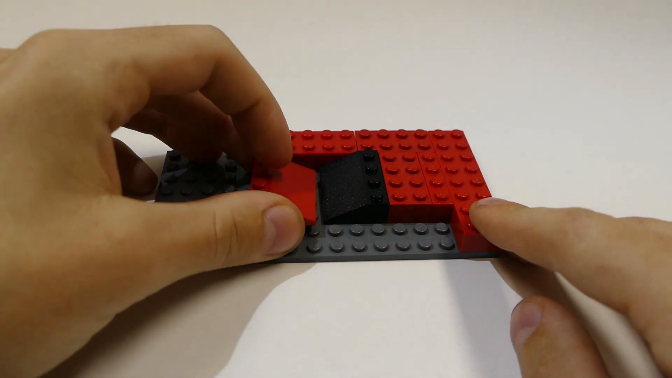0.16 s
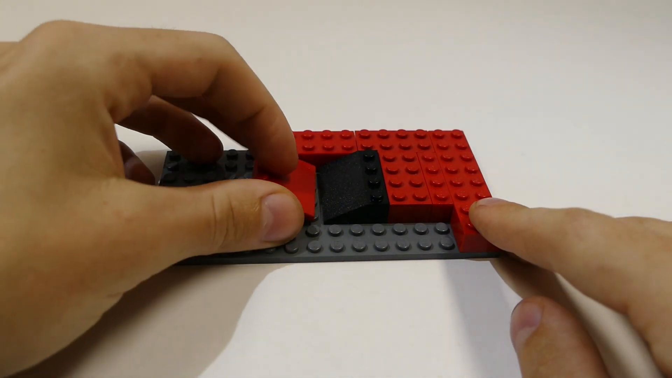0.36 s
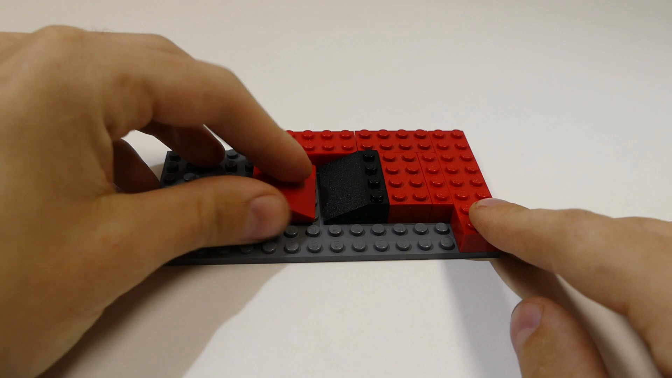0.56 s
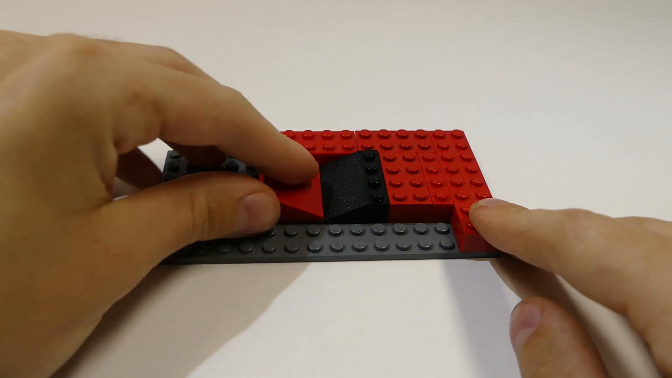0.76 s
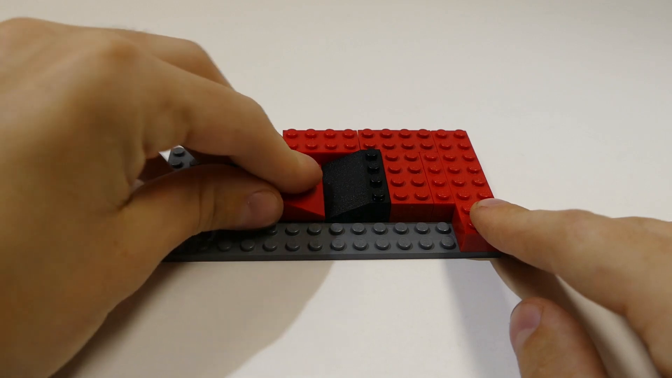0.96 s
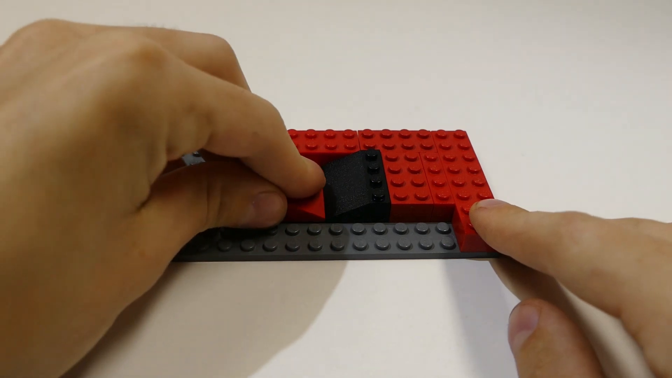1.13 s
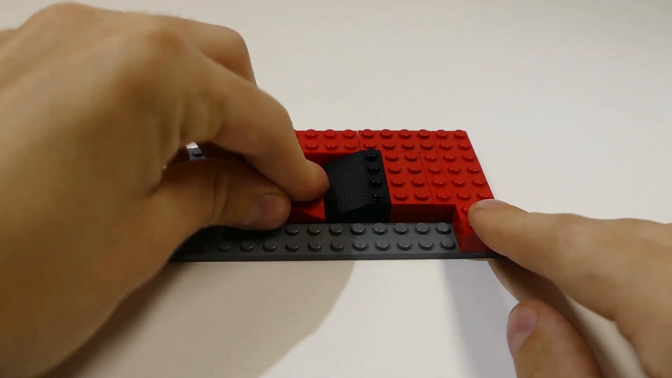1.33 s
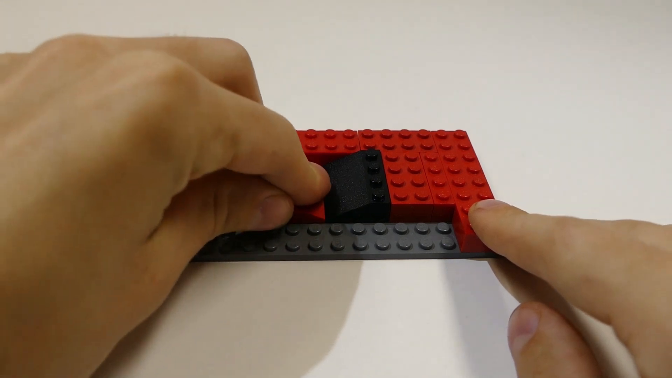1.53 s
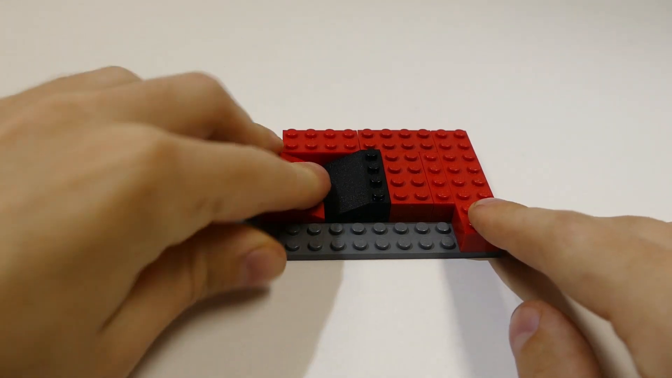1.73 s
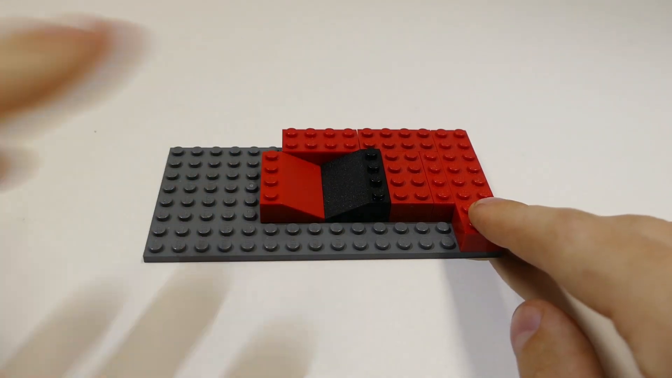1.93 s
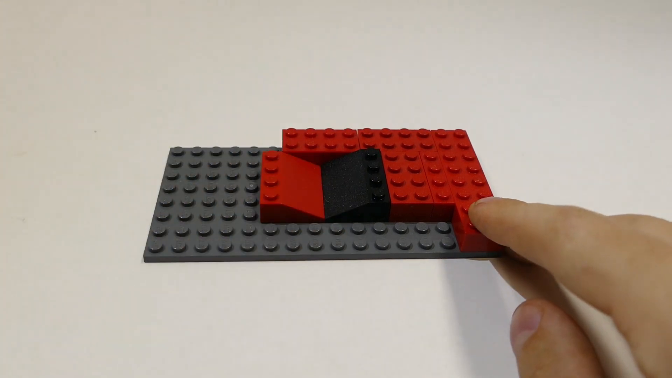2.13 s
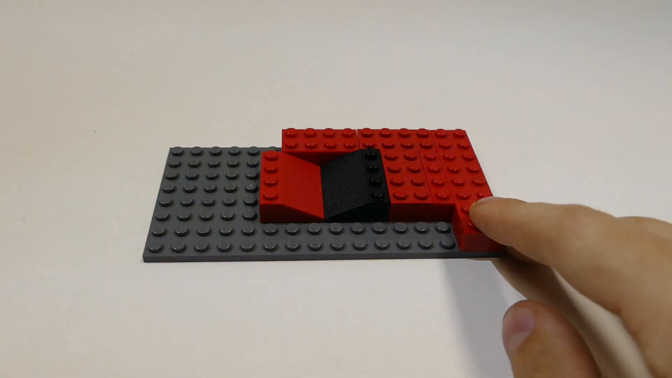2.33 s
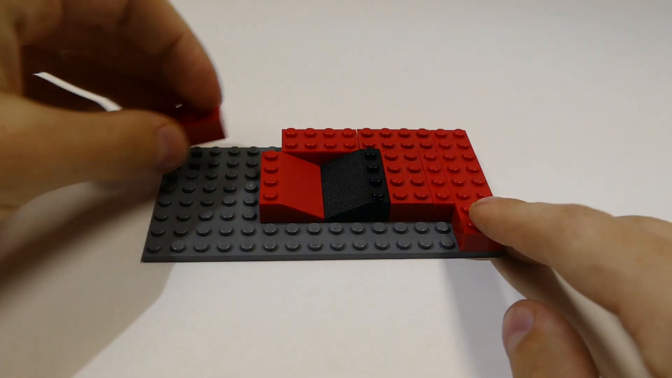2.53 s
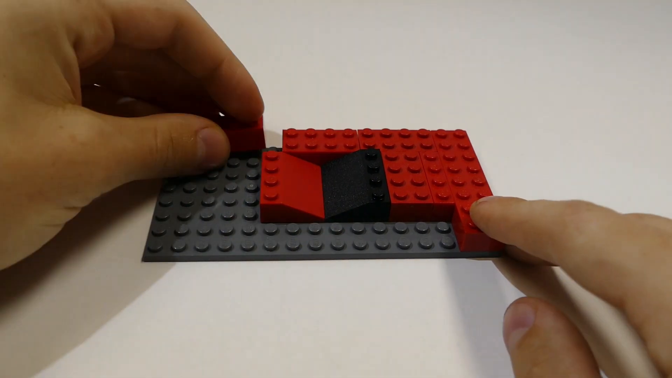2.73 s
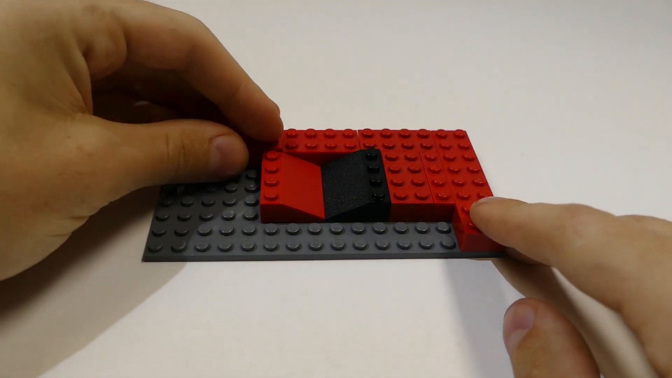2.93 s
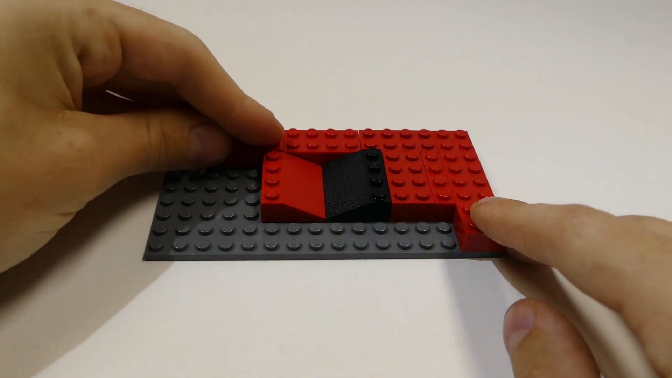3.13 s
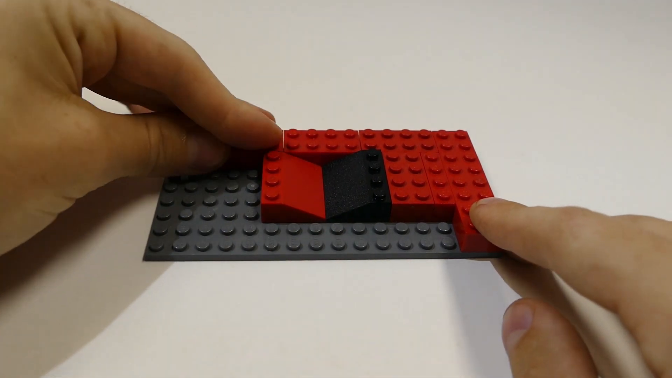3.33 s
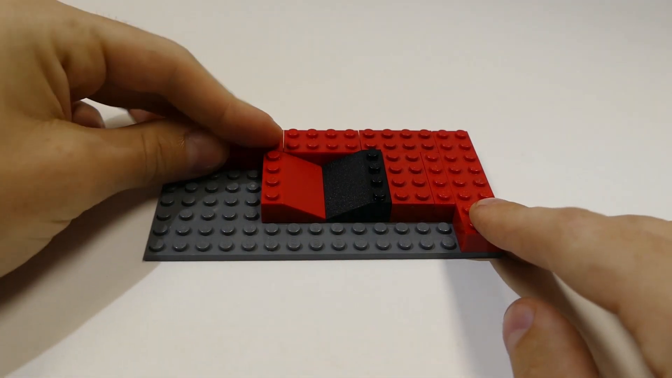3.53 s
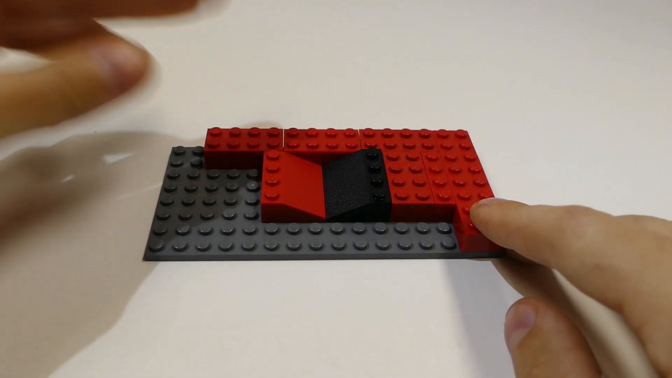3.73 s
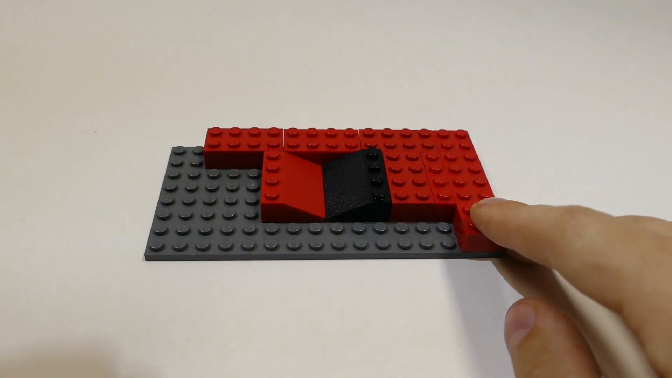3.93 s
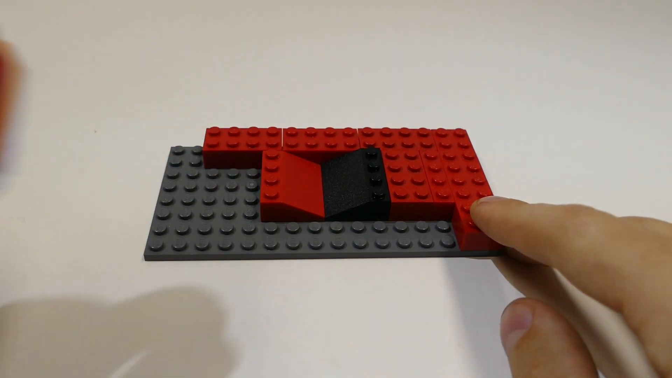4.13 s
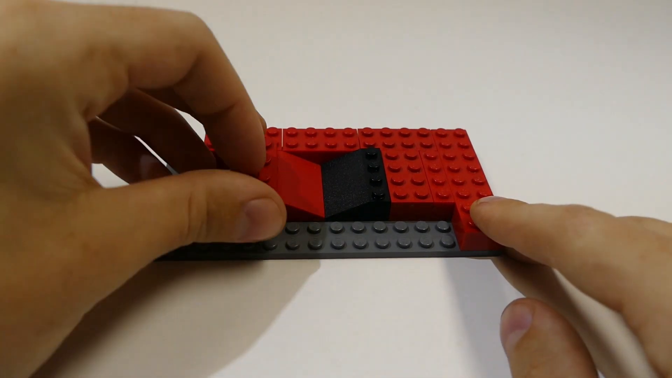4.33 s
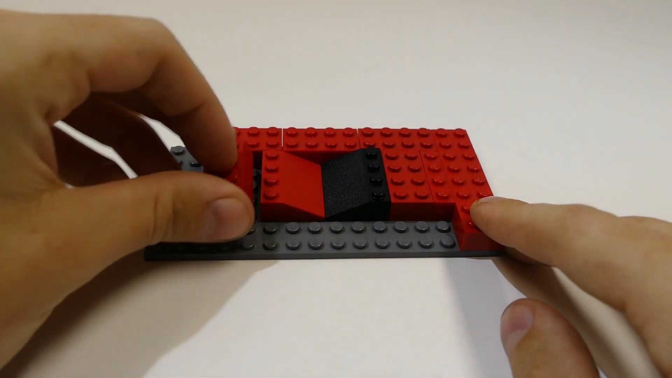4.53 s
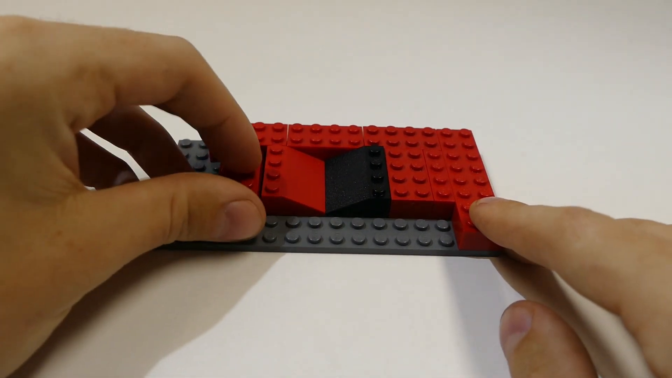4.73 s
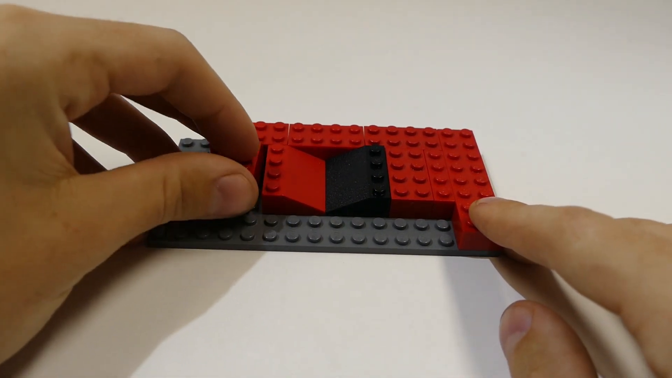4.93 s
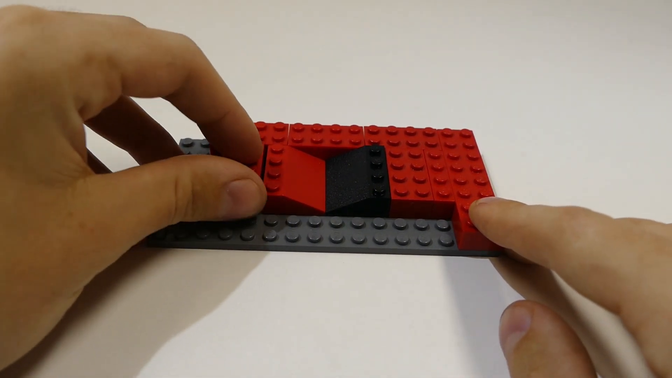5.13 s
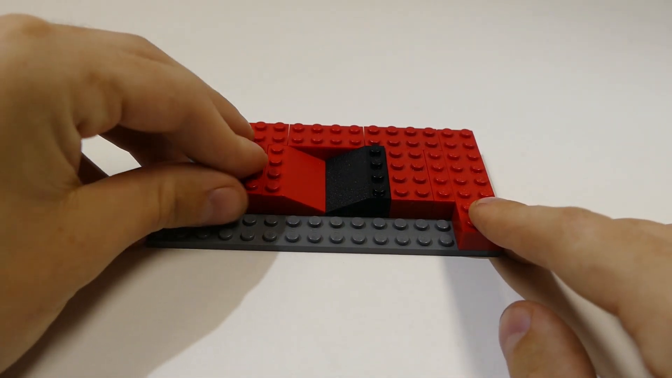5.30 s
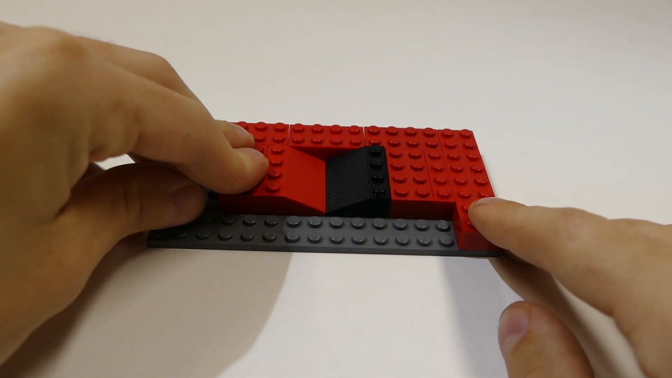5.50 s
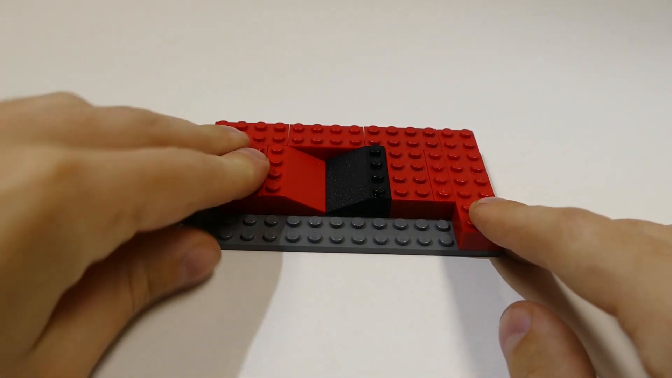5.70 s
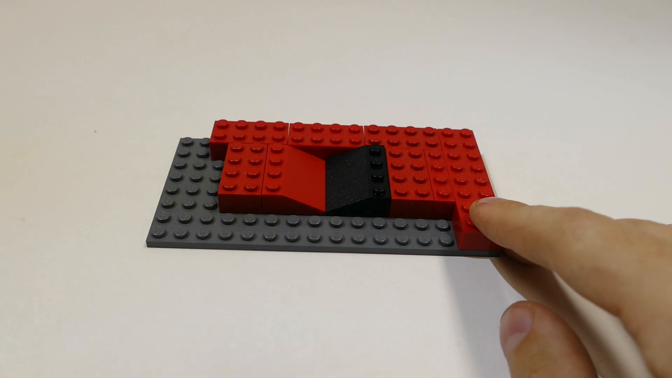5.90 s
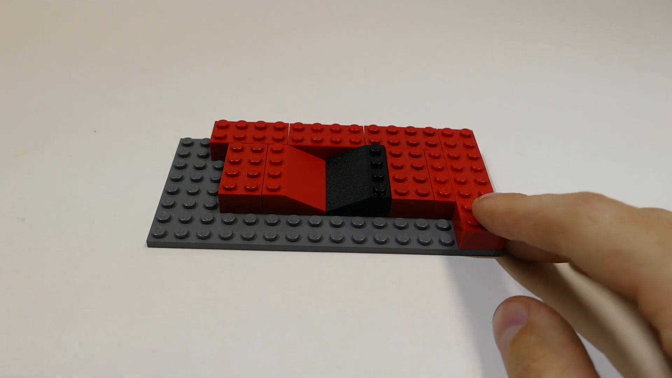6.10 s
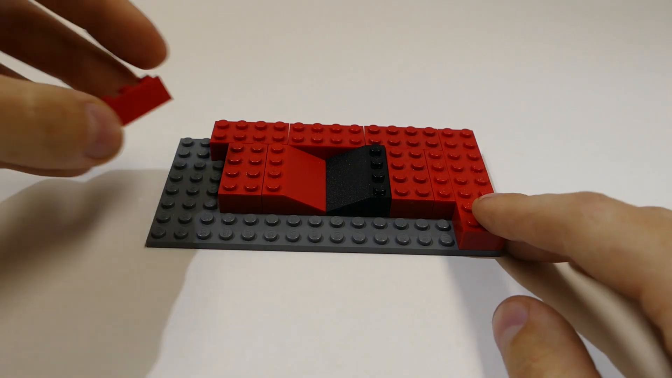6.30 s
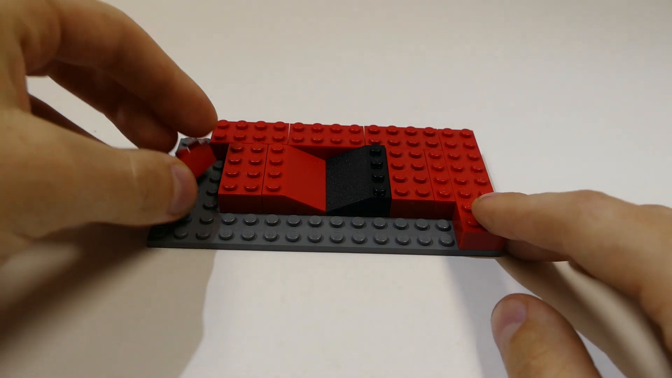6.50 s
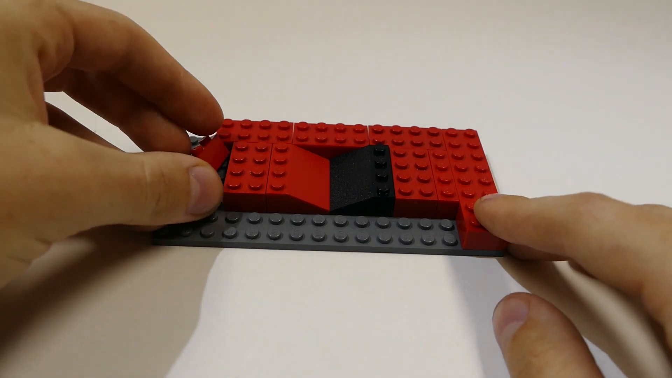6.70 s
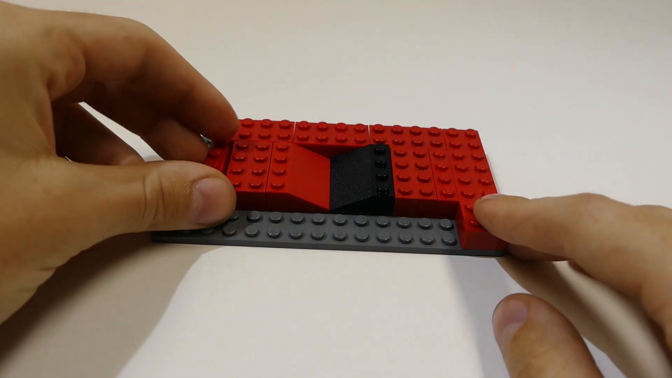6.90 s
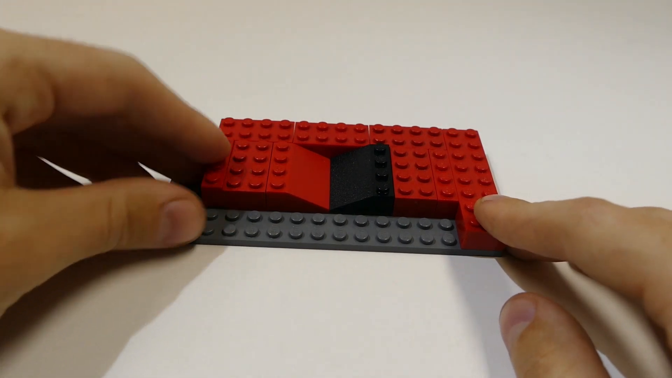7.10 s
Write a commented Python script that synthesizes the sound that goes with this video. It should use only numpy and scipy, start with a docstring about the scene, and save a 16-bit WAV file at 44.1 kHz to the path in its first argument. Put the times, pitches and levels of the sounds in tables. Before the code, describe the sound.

Small hollow plastic bricks click and snap onto a studded base plate in uneven bursts, with soft hand rubbing over quiet room tone.

```python
"""On a table in a quiet room, plastic bricks are set down, nudged and pressed onto a studded base plate.
Each contact excites modes of plate, table and hollow bricks plus a noise snap; the ceiling returns it.
Hands and sleeves rub softly as shaped noise over a faint steady rustle, thumps and squeaks are sines with
noise or waver, and filtered noise gives a room tone with a low hum and a thin wavering whine, in stereo."""
import sys
import numpy as np
from scipy import signal
from scipy.fft import rfft, irfft
from scipy.io import wavfile
from scipy.ndimage import uniform_filter1d

SR = 44100
rng = np.random.default_rng(int(sys.argv[2]) if len(sys.argv) > 2 else 0)


def unload_audio(sound):
    """Save the sound as a 16-bit wav file, at the path given as the first command line argument."""
    columns = np.transpose(np.atleast_2d(sound))
    # keep every value between -1 and 1, then stretch to whole-number steps
    steps = np.round(np.clip(columns, -1, 1) * 32767)
    wavfile.write(sys.argv[1], SR, steps.astype(np.int16))


N = 315305

# Contacts of brick, plate and table. Each row: start in seconds, plate peak in dB, pitch of the struck
# spot on the base in Hz, on the brick in Hz, then in dB relative to the plate: table knock, brick ring,
# edge tick.
CONTACTS = [(0.3883, -25.5, 1300, 3050, -6.5, 5.5, -9), (0.4066, -24.5, 747, 2960, -6, -10, -23),
            (0.416, -31, 850, 3170, -7, -7, -25), (0.4971, -17, 1342, 4053, -15, 1, -14),
            (0.754, -30.5, 1400, 3480, -19, 0, -23), (0.7685, -26.5, 1960, 3266, -6, 8, -2),
            (0.779, -21.5, 1988, 3405, -5, 3, -13), (1.8663, -42.5, 1040, 2780, -4, -6, -10.5),
            (2.7033, -34.5, 1414, 3150, -8.5, -8.5, -16.5), (2.7176, -37.5, 1390, 3730, -8, -4.5, -22),
            (2.9507, -28, 1375, 2970, -14, -4.5, -18), (2.9717, -27.5, 2000, 2400, -3.5, -7, -22.5),
            (2.9777, -22, 1370, 2200, -10.5, 3, -10.5), (3.2135, -47.5, 1270, 3680, -4, -0.5, 3),
            (3.309, -42.5, 1030, 2800, -11, -8, -12.5), (4.3913, -14.5, 1224, 2830, -12.5, -11.5, -23),
            (4.4291, -29.5, 870, 2350, -1.5, -17, -33), (4.4503, -30, 1180, 2590, -3, -19, -34),
            (4.523, -35.5, 868, 2830, -8.5, -23, -26), (4.6361, -31.5, 1290, 2800, -6, -7, -26),
            (4.6416, -25.5, 1404, 3350, -6, -5.5, -19.5), (4.6914, -37.5, 1210, 4460, -7, 5.5, -7),
            (4.7637, -33.5, 465, 3300, 1.5, -1.5, -11), (4.9248, -19, 1500, 3360, -8.5, -7, -15),
            (4.931, -15, 1430, 4530, -6, -8.5, -8), (4.9473, -22.5, 1190, 3170, -1.5, -1, -15),
            (5.048, -33.5, 1470, 3280, -4, 2, -26), (5.1003, -34, 696, 3240, -5, -4, -26),
            (5.1313, -40, 723, 3120, -2, -5, -25), (5.1531, -24, 788, 3140, -3, 0.5, -21.5),
            (5.2555, -42, 1970, 2980, 2, 0, -9), (5.2579, -16, 726, 2830, 0, 0, -3.5),
            (5.466, -46, 1880, 2370, -20, 0, -2.5), (5.805, -48, 1350, 3790, -4, -6, -11),
            (6.5886, -20, 1613, 3060, -12, -3.5, -16.5), (6.6649, -38.5, 1390, 3470, -8.5, -23, -9.5),
            (6.715, -37.5, 1930, 3700, -13, -14, -18), (6.7417, -40.5, 1330, 3440, -2, -12, -11),
            (6.7694, -28, 1300, 3030, -9.5, -16, -22), (6.776, -30, 1300, 3500, -9.5, -7.5, -23),
            (6.7953, -33, 1380, 5000, -9, 1.5, -2.5), (6.9056, -18.5, 1645, 3400, -10.5, -2, -14),
            (6.9226, -17, 1260, 3220, -7, 6, -4.5), (7.0516, -22.5, 1420, 3820, -27, 1.5, -12.5)]
# Modes of plate, table, brick cavity, brick walls and edge, in that order. Each row of a part: frequency
# in Hz, relative level in dB.
PART_MODES = [
    [(950, -2), (1100, -3), (1230, 0), (1365, 0), (1610, -1), (1930, -6)],
    [(460, -5), (695, 0), (815, -1)],
    [(2470, -7), (3100, -2), (3310, 0), (3550, -3)],
    [(4120, -2), (4540, -5), (5180, -5), (5910, -3), (6400, -7)],
    [(9500, -3), (10200, 0), (11300, -6)],
]
# The same five parts: decay time to -60 dB in seconds, before the struck spot prolongs it.
PART_T60 = [0.018, 0.025, 0.013, 0.013, 0.011]
# The same five parts: left minus right level in dB.
PART_PAN_DB = [-1, -3.9, 2, 0.8, -0.3]
# Low modes of the rubbed table. Each row: frequency in Hz, width in Hz, relative level in dB.
TABLE_MODES = [(406, 21, 0.5), (669, 8.6, 7), (805, 11.5, 4), (919.5, 7.4, 1.5), (1425, 110, -10.5),
               (2007, 37, -7.5)]
# Spectrum of the soft broadband swish. Each row: frequency in Hz, relative density in dB.
SWISH_SPECTRUM = [(80, -26), (250, -5.5), (450, 1.5), (1000, -5), (1600, -2.5), (4000, -17), (9000, -34),
                  (16000, -59.5)]
# Spectrum of fingertips on plastic. Each row: frequency in Hz, relative density in dB.
HISS_SPECTRUM = [(3000, -38), (5800, -9), (8000, -13.5), (9800, -8), (12000, -15.5), (15500, -23)]
# Spectrum of the room's air noise. Each row: frequency in Hz, relative density in dB.
AIR_SPECTRUM = [(20, -52), (85, -66), (130, -4), (300, -4.5), (600, -6), (1000, -14.5), (1460, -9.5),
                (2600, -20.5), (3500, -24.5), (8000, -27.5), (10000, -25.5), (15000, -30.5)]
# Likeness of the air noise at left and right. Each row: frequency in Hz, correlation (0 to 1).
AIR_LIKENESS = [(130, 1), (300, 0.88), (700, 0.015), (3000, 0.046), (15000, 0.13)]
# Narrow tones in the room. Each row: frequency in Hz, width in Hz, mean level in dB.
ROOM_TONES = [(119.9, 9.4, -75.5), (142.6, 9.9, -76), (2809, 35, -72)]
# Narrow dips in the overall spectrum. Each row: frequency in Hz, width in Hz.
SPECTRUM_DIPS = [(575, 44), (2680, 35)]
# Rubbing that hums in the table. Each row: start in seconds, length in seconds, level in dB.
HUM_STROKES = [(1.42, 0.17, -56), (1.6, .12, -55), (1.75, 0.15, -59), (1.88, 0.072, -55), (2.0, 0.078, -57),
               (2.11, 0.18, -60.5), (3.37, 0.18, -59), (3.66, 0.058, -51.5), (3.78, 0.18, -58.5),
               (5.51, 0.097, -59), (5.68, 0.1, -59), (5.96, 0.074, -59.5)]
# Soft broadband noise, in short swishes and in long, faint, steady stretches. Each row: start in seconds,
# length in seconds, level in dB.
SWISH_STROKES = [(0, 1.43, -66.5), (1.38, 0.94, -68.5), (2.45, 0.32, -61.5), (2.75, 0.94, -66),
                 (3.66, 0.13, -58.5), (3.76, .33, -55.5), (4.19, 1.82, -64), (5.76, .17, -59)]
# Fingertips turning a brick. Each row: start in seconds, length in seconds, level in dB.
HISS_STROKES = [(3.18, 0.055, -59.5), (6.195, 0.065, -60.5), (6.265, 0.064, -61)]
# Soft bumps of a hand on the table. Each row: start in seconds, level in dB, pitch in Hz.
HAND_THUMPS = [(1.395, -42, 176), (2.975, -37, 279), (3.307, -48.5, 199), (3.572, -50, 235),
               (5.251, -41, 168), (6.141, -55.5, 151), (6.588, -41.5, 266)]
# Faint rising squeaks. Each row: start in seconds, length in seconds, start pitch in Hz, end pitch in Hz,
# level of the fundamental in dB.
SQUEAK_GLIDES = [(2.233, 0.072, 4690, 5000, -82), (5.987, 0.098, 4780, 5360, -76.5)]

SNAP_DB, SNAP_T60 = -3, 0.019  # snap relative to the summed modes, decay in seconds
APART = 0.11  # left-right difference in radiation, as a fraction
FAVOUR_DB, FAVOUR_OCTAVES = 9.5, 0.16  # boost of modes near the struck spot, and its reach
DETUNE = 0.026  # random spread of mode pitch, as a fraction
MODE_SPREAD_DB = 2  # random spread of mode level, in dB
LINGER_HZ = 3210  # a mode at a struck spot of this pitch rings twice as long, at lower spots less
WALLS_DB, WALLS_FROM_HZ = -5.5, 3950  # walls relative to cavity, unless the struck spot is this high
CEILING_S, CEILING_DB = .0132, -14  # delay and loss of each return
SWISH_HISS_DB = -10  # hiss that goes along with the swish
ROOM_DB = -61.5
TOP_HZ = 15700


def clicks(low_hz=280):
    """Superposition: each contact is the sum of the responses of all parts that it excites."""
    out = np.zeros((2, N + SR))
    t = np.arange(2048) / SR
    for s, plate_db, base_hz, brick_hz, table_db, brick_db, edge_db in CONTACTS:
        at = int(s * SR)
        walls_db = brick_db + WALLS_DB * (brick_hz < WALLS_FROM_HZ)
        levels = [0, table_db, brick_db, walls_db, edge_db]
        spots = [base_hz, base_hz, brick_hz, brick_hz, brick_hz]
        for part, db, spot_hz, part_t60, pan_db in zip(PART_MODES, levels, spots, PART_T60, PART_PAN_DB):
            hit = struck_part(part, spot_hz, part_t60, t)
            pan = undb([[pan_db / 2], [-pan_db / 2]])
            out[:, at:at + len(t)] += undb(plate_db + db) * pan * hit / np.abs(hit.mean(0)).max()
    # small light parts radiate no bass
    return signal.sosfilt(signal.butter(4, low_hz, "high", fs=SR, output="sos"), out[:, :N])


def struck_part(part, spot_hz, part_t60, t, rise_cycles=0.86):
    """Impact response: free modes and a snap, built up over about a cycle of the lowest mode."""
    hz, mode_db = np.transpose(part)[:, :, None]
    ring = ringing_modes(hz, mode_db, spot_hz, part_t60, t)
    snap = plastic_snap(hz, spot_hz, t)
    hit = ring + undb(SNAP_DB + mode_db).sum() * snap / np.abs(snap).max()
    return hit * np.sin(np.pi / 2 * np.minimum(t * hz.min() / rise_cycles, 1)) ** 2


def ringing_modes(hz, mode_db, spot_hz, part_t60, t):
    """Modal superposition: damped sines, of which the struck spot favours its neighbours."""
    spread, shift, side = rng.standard_normal((3, len(hz), 1))
    # modes near the pitch of the struck spot bend towards it and are boosted and prolonged
    near = np.exp(-(np.log2(hz / spot_hz) / FAVOUR_OCTAVES) ** 2)
    gain = undb(mode_db + MODE_SPREAD_DB * spread + FAVOUR_DB * near)
    t60 = part_t60 * (1 + near * spot_hz / LINGER_HZ)
    pitch = hz * (spot_hz / hz) ** near * (1 + DETUNE * shift * (1 - near / 2))
    modes = gain * np.sin(2 * np.pi * pitch * t) * 1000. ** (-t / t60)
    # each mode radiates a little differently to left and right
    return np.array([(modes * (1 + APART * side)).sum(0), (modes * (1 - APART * side)).sum(0)])


def plastic_snap(hz, spot_hz, t, spot_width=0.34, spot_db=5):
    """High modal density: countless small damped modes act as decaying noise, densest round the spot."""
    edges_hz = [hz.min() / 1.063, hz.max() * 1.073]
    band = signal.butter(3, edges_hz, "band", fs=SR, output="sos")
    mid, opposed = rng.standard_normal((2, len(t))) * 1000. ** (-t / SNAP_T60)
    snap = signal.sosfilt(band, [mid + 2 * APART * opposed, mid - 2 * APART * opposed])
    return snap + undb(spot_db) * resonate(snap, spot_hz, spot_width * spot_hz)


def room(x, early_db=-27, early_t60=0.1, late_db=-47, late_t60=0.38, shared=0.63, dull_hz=11000,
         smear_s=0.00014):
    """Reflection: flutter between table and ceiling, each return more smeared, over two decaying tails."""
    t = np.arange(SR // 2) / SR
    common, left, right = rng.standard_normal((3, len(t)))
    noise = shared * common + (1 - shared) * np.array([left, right])
    early = undb(early_db) * 1000. ** (-t / early_t60)
    late = undb(late_db) * 1000. ** (-t / late_t60)
    tail = noise * (early + late)
    tail[:, :int(.002 * SR)] = 0
    for k in range(1, 4):
        bounce = noise * np.exp(-((t - k * CEILING_S) / (smear_s * k)) ** 2)
        tail += undb(k * CEILING_DB) * bounce / np.sqrt(np.sum(bounce ** 2) / 2)
    tail = signal.lfilter(*signal.butter(1, dull_hz, fs=SR), tail)
    return x + signal.fftconvolve(x, tail, axes=1)[:, :N]


def hands():
    """Friction noise: rubbing hums in the table's low modes, a soft broadband swish, fingertip hiss."""
    hum = pair(table_rub, 0.88)
    swish = pair(lambda: coloured(SWISH_SPECTRUM), 0.63)
    hiss = pair(lambda: coloured(HISS_SPECTRUM), 0.72)
    # the level of each wanders by a few dB
    hum_swing, swish_swing, hiss_swing = undb([2.8 * walk(90), 1.8 * walk(45), 1.8 * walk(35)])
    swish_gain = strokes(SWISH_STROKES, .1)
    hiss_gain = strokes(HISS_STROKES, .035) + undb(SWISH_HISS_DB) * swish_gain
    rubbing = hum * strokes(HUM_STROKES) * hum_swing
    return rubbing + swish * swish_gain * swish_swing + hiss * hiss_gain * hiss_swing + thumps()


def table_rub():
    """Forced resonance: friction noise drives the table's low modes."""
    return unit(sum(undb(db) * resonate(rng.standard_normal(N), hz, width_hz)
                    for hz, width_hz, db in TABLE_MODES))


def thumps(rise_s=0.011, t60=0.15, scuff_db=1.0):
    """Soft impact: flesh pushes slowly, so it wakes the table's bass, and scuffs a little."""
    out = np.zeros(N + SR)
    t = np.arange(4096) / SR
    envelope = (1 - np.exp(-t / rise_s)) * 1000. ** (-t / t60)
    for s, db, hz in HAND_THUMPS:
        scuff = unit(resonate(rng.standard_normal(len(t)), 1.6 * hz, hz))
        body = np.sin(2 * np.pi * hz * t) + undb(scuff_db) * scuff
        out[int(s * SR):][:len(t)] += undb(db) * body * envelope
    return out[:N]


def squeaks(octave_db=8.0, waver=0.0096):
    """Frequency modulation: thin wavering tones with a stronger octave glide up and fade in and out."""
    out = np.zeros(N)
    for s, length, start_hz, end_hz, db in SQUEAK_GLIDES:
        at, n = int(s * SR), int(length * SR)
        pitch = np.linspace(start_hz, end_hz, n) * (1 + waver * walk(46)[:n])
        turns = np.cumsum(pitch) / SR
        tone = np.sin(2 * np.pi * turns) + undb(octave_db) * np.sin(4 * np.pi * turns)
        out[at:at + n] += undb(db) * np.hanning(n) * tone
    return out


def room_tone():
    """Broadband and narrowband noise: slightly breathing air, and wavering tones up to a thin whine."""
    air_gain = undb(ROOM_DB + .5 * walk(12.0))
    air = pair(lambda: coloured(AIR_SPECTRUM), on_log(AIR_LIKENESS)) * air_gain
    for hz, width_hz, db in ROOM_TONES:
        tone = pair(lambda: unit(resonate(rng.standard_normal(N), hz, width_hz)), 0.9)
        air += undb(db + 1.8 * walk(9)) * tone
    return air


def strokes(table, edge_s=0.041):
    """Amplitude envelope: gain of strokes that set in and let go softly."""
    t, gain = np.arange(N) / SR, 0
    for s, length, db in table:
        inside_s = np.minimum(t - s, s + length - t)
        gain = gain + undb(db) * np.clip(inside_s / edge_s + .5, 0, 1) ** 2
    return gain


def pair(make, likeness):
    """Interchannel correlation: left and right from a shared and an opposed noise."""
    c = np.clip(likeness, 0, 1)
    mid = rfft(make()) * np.sqrt((1 + c) / 2)
    side = rfft(make()) * np.sqrt((1 - c) / 2)
    return np.array([irfft(mid + side, N), irfft(mid - side, N)])


def coloured(points):
    """Spectral shaping: noise of rms 1 with the given (Hz, dB) spectrum."""
    return unit(irfft(rfft(rng.standard_normal(N)) * undb(on_log(points)), N))


def on_log(points):
    """Logarithmic frequency: (Hz, value) points interpolated on every bin of an N-point spectrum."""
    hz, value = np.transpose(points)
    return np.interp(np.log(np.fft.rfftfreq(N, 1 / SR) + 1), np.log(hz), value)


def resonate(x, hz, width_hz):
    """Resonance: a single mode with gain 1 at its centre."""
    return signal.lfilter(*signal.iirpeak(hz, hz / width_hz, SR), x)


def walk(rate):
    """Slow fluctuation: random levels held 1 / rate s and slewed twice, spread near 1."""
    k = int(SR / rate)
    steps = np.repeat(rng.standard_normal(N // k + 1), k)
    return unit(uniform_filter1d(uniform_filter1d(steps, k), k)[:N])


def undb(db):
    """Decibel: amplitude gain of a dB value."""
    return 10 ** (np.asarray(db) / 20)


def unit(x):
    """Root mean square: scale to rms 1."""
    return x / np.sqrt(np.mean(x ** 2))


def scene():
    """Superposition: clicks in the room over handling, squeaks and room tone."""
    return room(clicks()) + hands() + squeaks() + room_tone()


def record(dry):
    """Linear filtering: a few narrow dips and a steep top."""
    for hz, width_hz in SPECTRUM_DIPS:
        dry = signal.lfilter(*signal.iirnotch(hz, hz / width_hz, SR), dry)
    return signal.sosfilt(signal.ellip(8, .2, 60, TOP_HZ, fs=SR, output="sos"), dry)


dry = scene()
out = record(dry)
unload_audio(out)
```